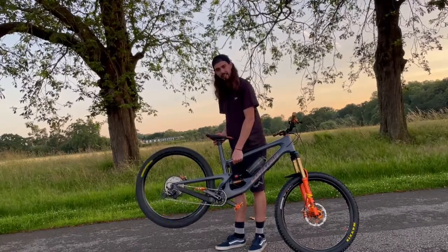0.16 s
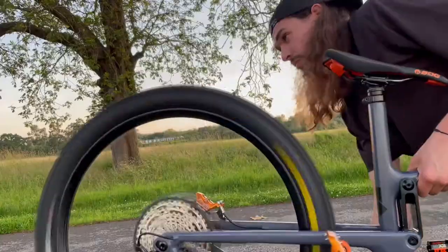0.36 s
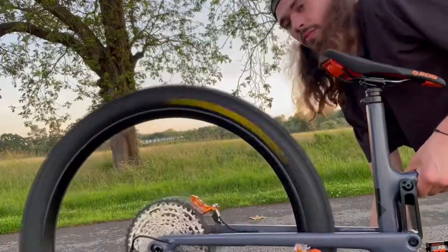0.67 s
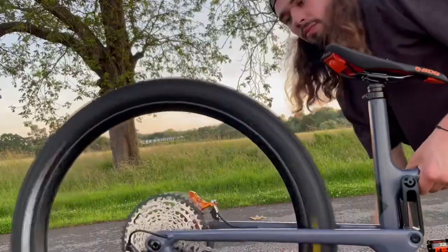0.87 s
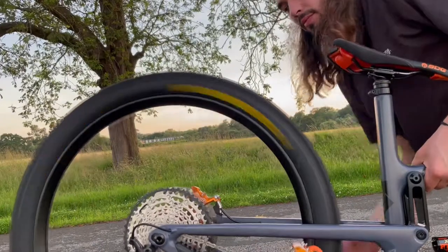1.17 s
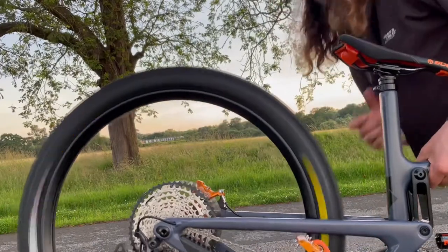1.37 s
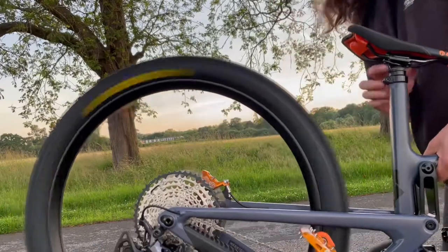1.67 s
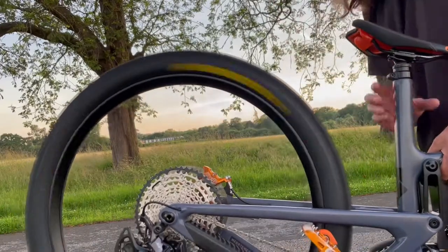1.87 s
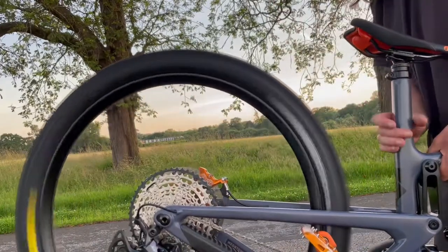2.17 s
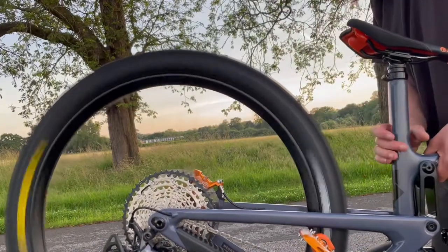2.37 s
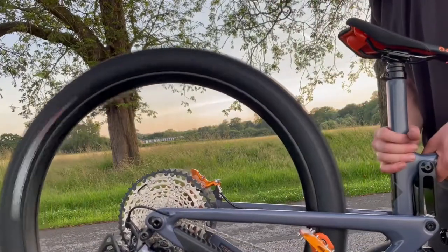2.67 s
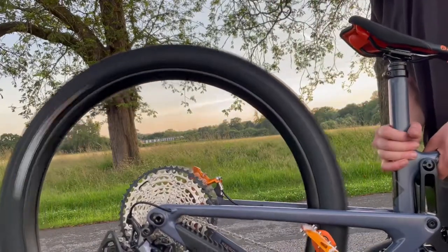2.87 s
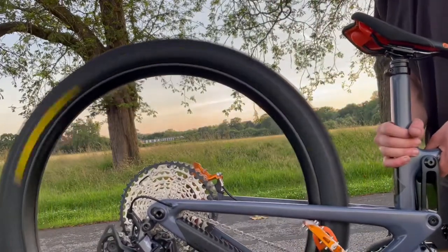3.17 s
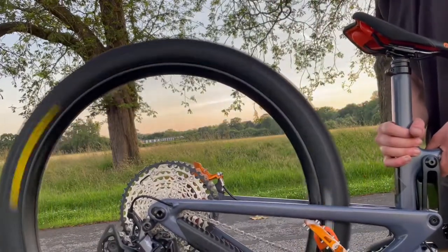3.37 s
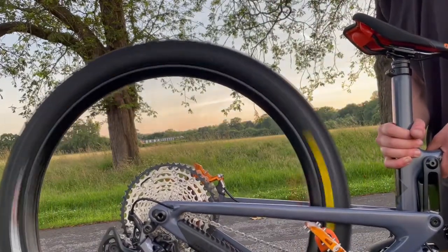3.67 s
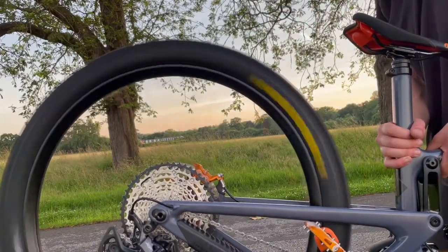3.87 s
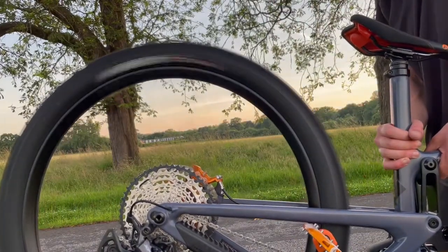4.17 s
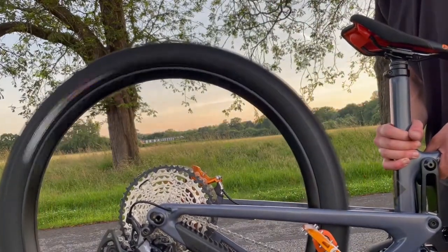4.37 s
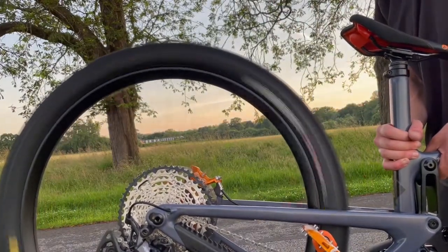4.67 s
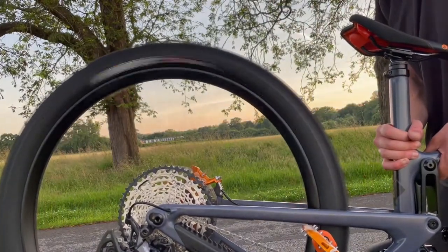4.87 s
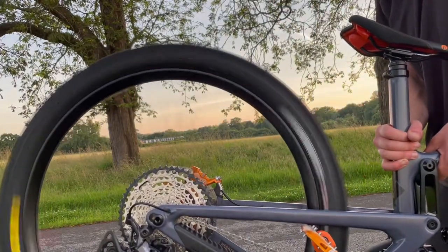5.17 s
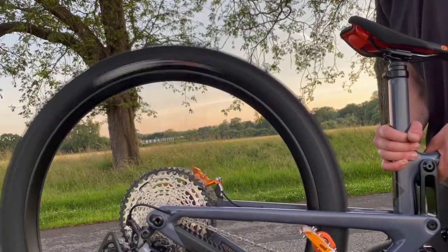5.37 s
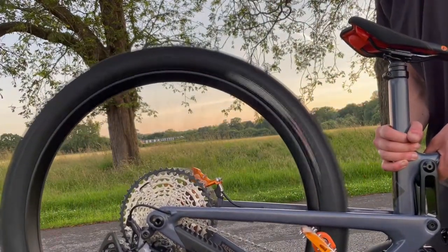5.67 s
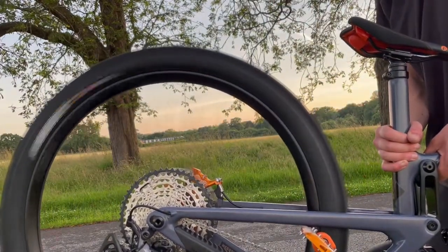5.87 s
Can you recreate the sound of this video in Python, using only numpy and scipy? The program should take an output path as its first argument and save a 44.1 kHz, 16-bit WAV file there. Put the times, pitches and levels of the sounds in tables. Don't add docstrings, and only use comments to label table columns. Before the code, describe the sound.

Close, sharp freehub buzz from a spinning bike wheel, gradually slowing and dropping in pitch, over a faint meadow rustle and low traffic rumble.

```python
import sys
import numpy as np
from scipy import signal
from scipy.fft import rfft, irfft, next_fast_len
from scipy.io import wavfile
from scipy.ndimage import uniform_filter1d, map_coordinates

SR = 44100
rng = np.random.default_rng(int(sys.argv[2]) if len(sys.argv) > 2 else 0)


def ratio_of_db(decibels):
    return 10 ** (np.asarray(decibels, float) / 20)


def to_wav(sig):
    pcm = np.clip(np.atleast_2d(sig), -1, 1) * 32767
    pcm = np.round(pcm).astype(np.int16)
    wavfile.write(sys.argv[1], SR, pcm.T)


N = 266143
TIME = np.arange(N) / SR
FAR_END_S, NEAR_START_S = .164, .209
IS_FAR = TIME < NEAR_START_S


def unit(x):
    return x / np.sqrt(np.mean(x ** 2) + 1e-20)


def along(points, hz):
    f, value = np.transpose(points)
    return np.interp(np.log(hz + 1), np.log(f + 1), value)


def over_time(rows):
    s, value = np.transpose(rows)
    return np.interp(TIME, s, value)


def wobble(knots_per_s):
    return map_coordinates(rng.standard_normal(200), [TIME * knots_per_s])


def filtered(x, response):
    size = next_fast_len(N + 8192)
    spectrum = rfft(x, size) * response(np.fft.rfftfreq(size, 1 / SR))
    return irfft(spectrum, size)[..., :N]


def pulses(times, sizes):
    at = times * SR
    index = np.floor(at)[:, None] + np.arange(-7, 9)
    offset = index - at[:, None]
    shape = np.sinc(offset) * np.cos(np.pi * offset / 16) ** 2
    index = np.clip(index, 0, N + 20).astype(int).ravel()
    return np.bincount(index, (sizes[:, None] * shape).ravel(), N + 21)[:N]


# start_s, level_db
NEAR_LEVEL = [
    (.21, -29),
    (.26, -22),
    (.5, -22.5),
    (1, -23.5),
    (3, -23.5),
    (6.03, -23),
]


def freehub():
    times = pawls(jitter_us=8, drift_us=20)
    angle = beam_angle()
    force = pawl_force(times)
    buzz = wheel_ring(times) * ratio_of_db(0.099 * wobble(11))
    buzz += spokes(force, angle)
    buzz += shell(force, angle)
    buzz += rim(force, angle)
    buzz += flange(force, angle)
    return ratio_of_db(np.where(IS_FAR, -29, over_time(NEAR_LEVEL))) * buzz


def wheel_speed(t):
    return 283.84 - 22.84 * t + .327 * t * t


def tooth_times(t, rate):
    passed = np.cumsum(rate) / SR
    return np.interp(np.arange(int(passed[-1]) + 1), passed, t)


# start_s, rate_clicks_per_s
FAR_RATE = [
    (0, 232.5),
    (.17, 229.5),
]
# start_s, speed_teeth_per_s (forward positive)
CRANKS = [
    (.2095, 219),
    (.29, 27),
    (.33, -24),
    (.41, -45),
    (.61, -5),
    (.7, -19),
    (.81, -23),
    (.97, 9),
    (1.3, 0),
]


def pawls(jitter_us, drift_us):
    far = TIME < FAR_RATE[-1][0]
    near = TIME >= CRANKS[0][0]
    inertia_s = .03
    cranks = uniform_filter1d(over_time(CRANKS)[near], size=round(inertia_s * SR), mode="nearest")
    far_times = tooth_times(TIME[far], over_time(FAR_RATE)[far])
    near_times = tooth_times(TIME[near], wheel_speed(TIME[near]) - cranks)
    times = np.concatenate([far_times, near_times])
    luck = rng.standard_normal((len(times), 2))
    drift = unit(uniform_filter1d(luck[:, 1], size=6))
    return np.abs(times + 1e-6 * (jitter_us * luck[:, 0] + drift_us * drift))


# start_s, scrape_share
DRAG = [
    (0, 0.61),
    (.2, 0.75),
    (.3, 1),
    (.55, 0.91),
    (.7, 0.8),
    (1, 0.42),
    (6, 0.39),
]


def pawl_force(times):
    snaps = unit(pulses(times, ratio_of_db(1.2 * rng.standard_normal(len(times)))))
    second_delay_s, second_share = .0006, 0.2
    snaps = unit(snaps + second_share * np.roll(snaps, round(second_delay_s * SR)))
    drag = over_time(DRAG)
    damping = ratio_of_db(-4.5 * drag)
    return damping * (snaps + drag * rng.standard_normal(N))


def wheel_ring(times):
    steady = dense_ring(times, memory=.9, crack_db=-14.0, t60=0.17)
    loose = dense_ring(times, memory=0.48, crack_db=6.5, t60=0.021)

    def high(hz):
        return 1 / (1 + (9500 / (hz + 1)) ** 3)

    ring = filtered(steady, lambda hz: wheel_colour(hz) * np.sqrt(1 - high(hz)))
    ring += filtered(loose, lambda hz: wheel_colour(hz) * np.sqrt(high(hz)))
    return unit(ring)


def dense_ring(times, memory, crack_db, t60):
    t = np.arange(700) / SR
    noise = rng.standard_normal((len(times), len(t)))
    tails = signal.lfilter([1], [1, -np.clip(memory, 0, .99)], noise, axis=0)
    rise = 1 - np.exp(-t / .00015)
    crack = ratio_of_db(crack_db - 60 * t / .006)
    tails *= rise * (ratio_of_db(-60 * t / t60) + crack)
    index = np.round(times * SR).astype(int)[:, None] + np.arange(len(t))
    return unit(np.bincount(index.ravel(), tails.ravel(), N + SR)[:N])


# pitch_hz, level_db (per Hz)
DENSE = [(300, -60), (1500, -34), (4300, -18), (5500, -11), (6400, -10.5), (7000, -5), (7500, -9),
         (8950, -.5), (9350, -7.5), (11300, -8.5), (12700, -11.5), (14200, -9.5), (15050, 0), (15800, -1)]
# pitch_hz, width_hz, level_db
GLINTS = [(7850, 200, 3), (8350, 250, 4), (9600, 250, 2.5), (10800, 500, 2.5), (11850, 700, 2.5),
          (12950, 220, 4), (13950, 250, 4)]


def wheel_colour(hz):
    glints_db = sum(db * np.exp(-(2 * (hz - centre) / width) ** 2) for centre, width, db in GLINTS)
    return ratio_of_db(along(DENSE, hz) + glints_db)


# pitch_hz, width_hz, level_db, beam_depth_db, beam_angle_rad
SPOKES = [(397, 10, 0, 8, -24), (490, 2, 11.5, 2, 11), (866, 26, 1, 6, 2), (975, 35, -0.5, 3, -3.5),
          (1162, 205, -3.5, 1, -1.5), (1398, 38, 4.5, 3, -0.5), (1639, 28, -0.5, 3.5, -3)]


def spokes(force, angle):
    return ratio_of_db(-12.5) * ringing(force, SPOKES, angle, wander_db=2.5)


# pitch_hz, width_hz, level_db, beam_depth_db, beam_angle_rad
SHELL = [(2130, 130, -1.5, 4.5, -.9), (2450, 260, -6, 3.5, -2.4), (2790, 230, 1.5, 4.5, -1.6)]


def shell(force, angle):
    level_db = seen(far=3, edge_on=-4.5, flange_on=-3)
    return ratio_of_db(level_db) * ringing(force, SHELL, angle, wander_db=2.85)


# pitch_hz, width_hz, level_db, beam_depth_db, beam_angle_rad
RIM = [(1800, 200, -12, 3, -1.3), (3060, 240, -.5, 4.5, -1.5), (3450, 330, .5, 6, -1.3),
       (3800, 260, -3, 3, -1.4), (4250, 300, -4.5, 3, -1.4)]


def rim(force, angle):
    level_db = seen(far=1, edge_on=-4, flange_on=-9.5)
    return ratio_of_db(level_db) * ringing(force, RIM, angle, wander_db=3.5)


# pitch_hz, width_hz, level_db, beam_depth_db, beam_angle_rad
FLANGE = [(4960, 240, 7, 1.6, -2.1), (6070, 110, 5, 2.5, .7)]


def flange(force, angle):
    level_db = seen(far=-42, edge_on=-13.5, flange_on=-4)
    return ratio_of_db(level_db) * ringing(force, FLANGE, angle, wander_db=2.0)


def ringing(force, modes, angle, wander_db):
    hz, width, db, depth_db, facing = np.transpose(modes)[:, :, None]
    rings = filtered(force, lambda f: 1j * f * width / (hz * hz - f * f + 1j * f * width))
    flicker_db = wander_db * np.array([wobble(30) for _ in modes])
    beam_share = seen(far=.2, edge_on=1.1, flange_on=.45)
    beam_db = beam_share * depth_db * np.cos(angle + facing)
    sign = (-1) ** np.arange(len(modes))[:, None]
    return np.sum(sign * ratio_of_db(db + beam_db + flicker_db) * rings, axis=0)


def beam_angle():
    start_teeth, teeth_per_sweep = -4.0, 44.1
    passed = np.cumsum(wheel_speed(TIME)) / SR
    return 2 * np.pi * (start_teeth + passed) / teeth_per_sweep


# start_s, flange_share (0 edge-on, 1 flange-on)
VIEW = [
    (.25, 0.54),
    (1, 0),
    (2.3, 0.32),
    (3, .9),
    (4.5, 0.78),
    (6, 0.51),
]


def seen(far, edge_on, flange_on):
    return np.where(IS_FAR, far, edge_on + over_time(VIEW) * (flange_on - edge_on))


# pitch_hz, left_lead_rad
LEAD = [(60, 0), (1200, -.3), (2400, 0), (3300, 1.1), (3800, 0), (5100, .4), (5900, -1.5), (6900, -3),
        (7950, -3.25), (9900, -6.1), (11900, -6.4), (13500, -9.15), (15000, -9.6), (15800, -10.3)]
# pitch_hz, left_minus_right_db
TILT = [(500, .5), (2200, 0), (2800, 4), (4000, 1), (5000, 4.5), (6300, 3), (6800, 0), (15000, 0)]


def ports(x, scattered_db, sway):
    side = np.array([[.5], [-.5]])
    pair = filtered(x, lambda hz: ratio_of_db(side * along(TILT, hz)) * np.exp(1j * side * along(LEAD, hz)))
    turn = side * sway * wobble(20.95)
    quarter_ahead = filtered(pair, lambda hz: 1j + 0 * hz)
    pair = np.cos(turn) * pair + np.sin(turn) * quarter_ahead
    scatter = rng.standard_normal((2, 2000)) * ratio_of_db(-60 * np.arange(2000) / SR / .03)
    scatter = uniform_filter1d(scatter, size=6)
    scatter = scatter / np.linalg.norm(scatter[0])
    return pair + ratio_of_db(scattered_db) * signal.fftconvolve(x[None], scatter, axes=1)[:, :N]


# pitch_hz, width_hz, level_db, beam_depth_db, beam_angle_rad
HUM = [(378, 9, -9, 0, 0), (405, 7, 1, 0, 0), (491, 5, 1, 0, 0)]


def spoke_hum(rustle_db):
    return ratio_of_db(rustle_db + 4.5) * unit(ringing(rng.standard_normal(N), HUM, 0, wander_db=0.5))


# pitch_hz, level_db (per Hz)
RUSTLE = [(100, -30), (200, -1), (300, -3), (450, -1), (700, -4), (1500, -8), (2500, -14), (5000, -22),
          (15000, -30)]


def rustle(rustle_db):
    return ratio_of_db(rustle_db + 10.5 + 2.16 * wobble(4.03)) * airborne(RUSTLE, alike=0.71)


# pitch_hz, level_db (per Hz)
RUMBLE = [(12, -66), (20, -28), (39, -3), (59, 3.5), (105, -3), (134, -6), (250, -19), (320, -91),
          (550, -120)]


def traffic():
    level_db = -56 + 7 * IS_FAR + 1.5 * wobble(3.5)
    return ratio_of_db(level_db) * airborne(RUMBLE, alike=0.86)


def airborne(spectrum, alike):
    mid, side = filtered(rng.standard_normal((2, N)), lambda hz: ratio_of_db(along(spectrum, hz)))
    turn = np.arccos(np.clip(alike, -1, 1)) / 2
    return unit(np.cos(turn) * mid + np.sin(turn) * side * [[1], [-1]])


def meadow():
    chain_peak_s, chain_length_s = 0.57, 0.47
    chain_db = 3.5 * np.exp(-((TIME - chain_peak_s) / chain_length_s) ** 2)
    rustle_db = -61 - 1.17 * TIME + chain_db
    return traffic() + spoke_hum(rustle_db) + rustle(rustle_db)


def scene_change():
    since = TIME - FAR_END_S
    tail_s = .03
    tail = ratio_of_db(-22 - 700 * np.clip(since, 0, tail_s)) * (since < tail_s)
    is_open = (since < 0) | (since > NEAR_START_S - FAR_END_S)
    return uniform_filter1d(np.where(is_open, 1, tail), size=60)


def scene():
    hub = ports(freehub(), scattered_db=-12.5, sway=0.16)
    return hub + meadow() * ratio_of_db([[.4], [-.4]])


def top_cut(x):
    return signal.sosfilt(signal.butter(12, 15900, fs=SR, output="sos"), x)


def record(dry):
    limited = filtered(dry, lambda hz: hz < 15780)
    return top_cut(limited * scene_change())


dry = scene()
out = record(dry)
to_wav(out)
```